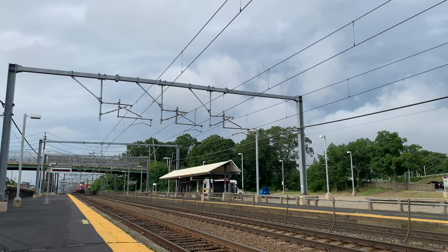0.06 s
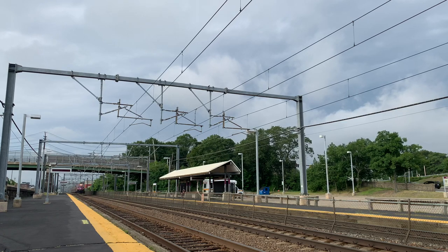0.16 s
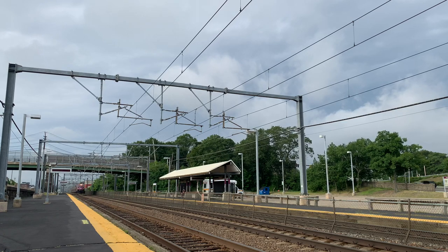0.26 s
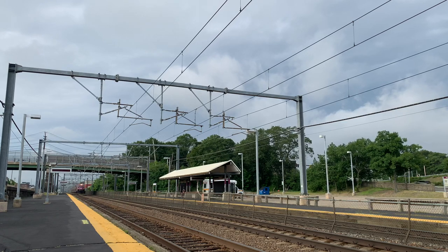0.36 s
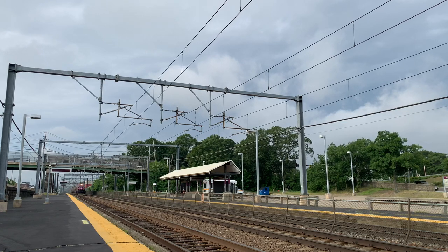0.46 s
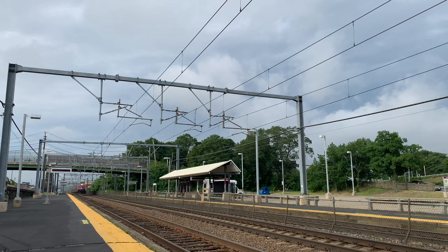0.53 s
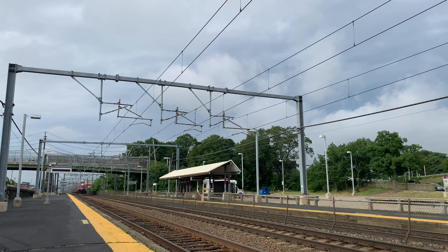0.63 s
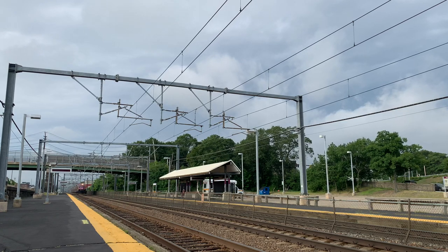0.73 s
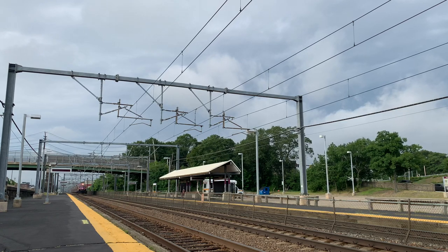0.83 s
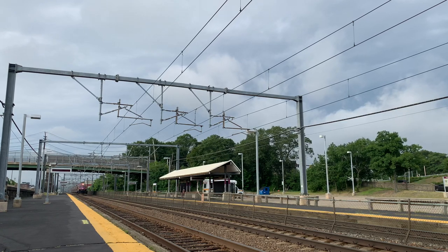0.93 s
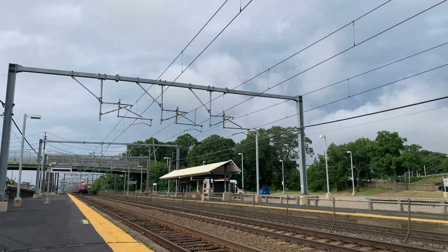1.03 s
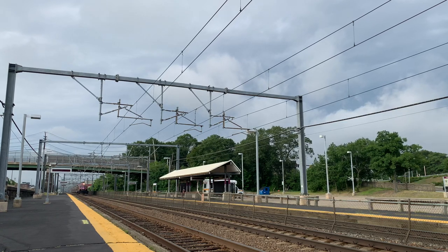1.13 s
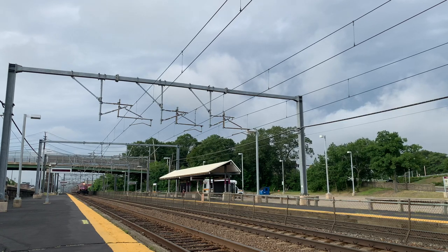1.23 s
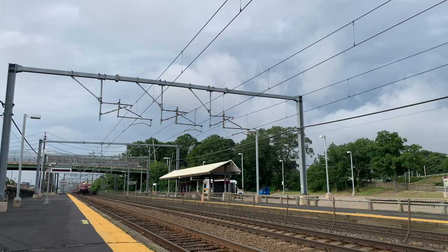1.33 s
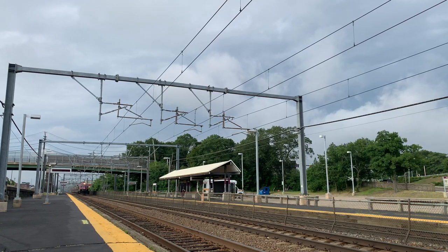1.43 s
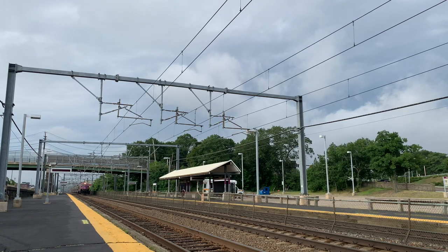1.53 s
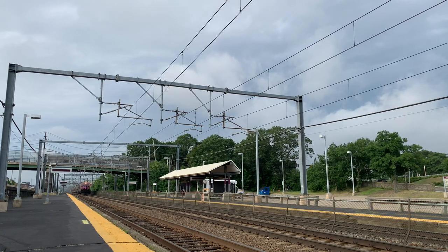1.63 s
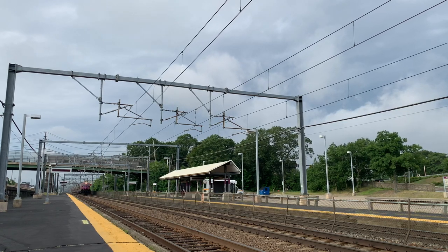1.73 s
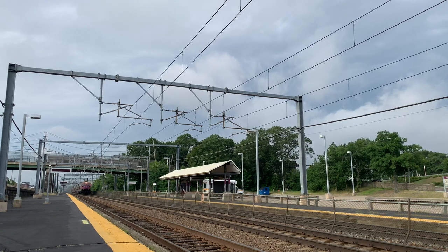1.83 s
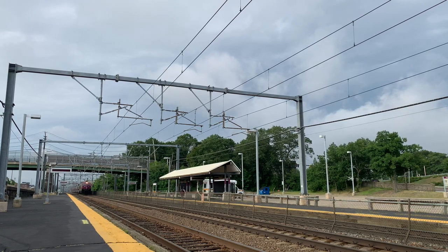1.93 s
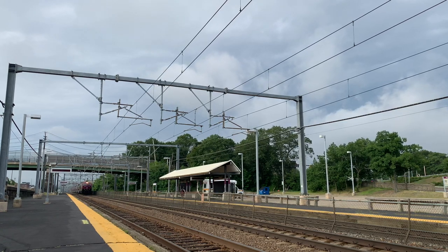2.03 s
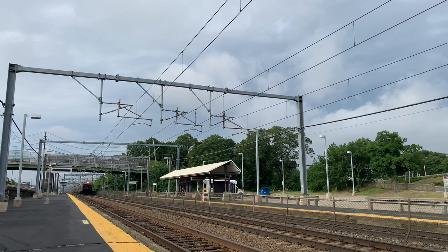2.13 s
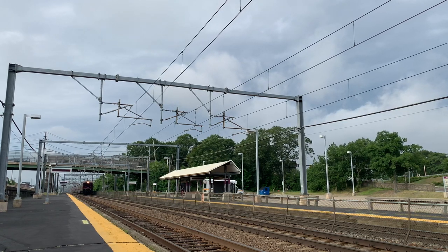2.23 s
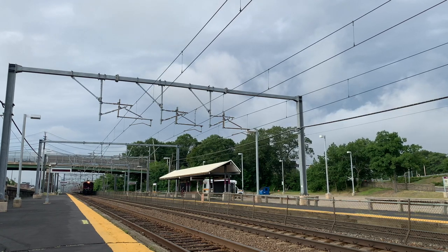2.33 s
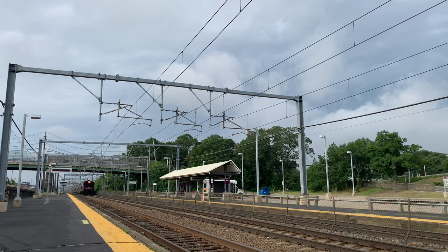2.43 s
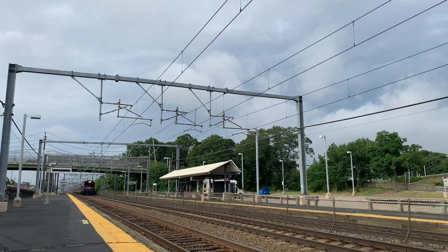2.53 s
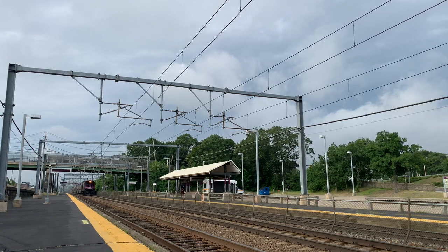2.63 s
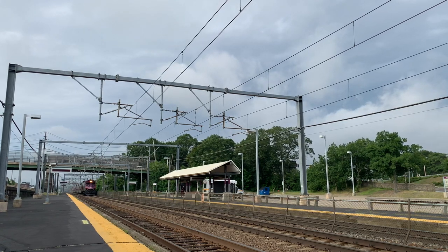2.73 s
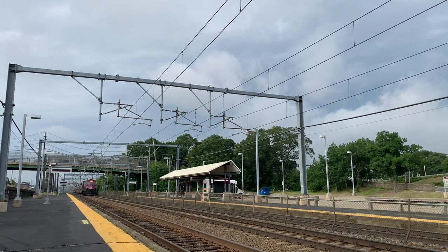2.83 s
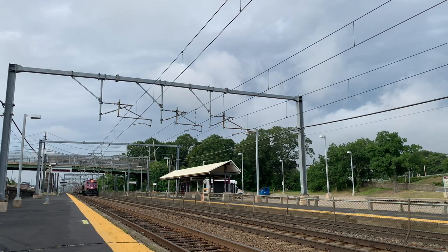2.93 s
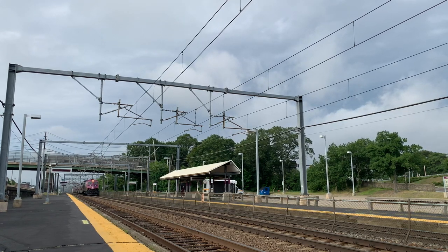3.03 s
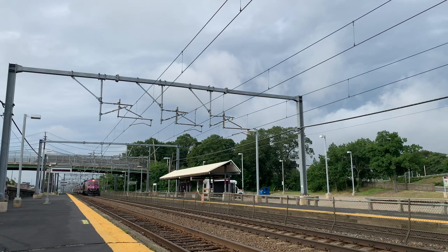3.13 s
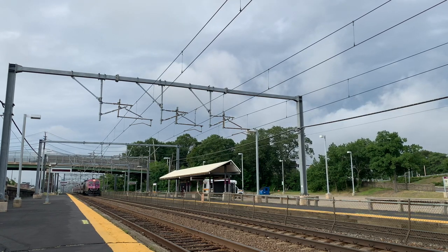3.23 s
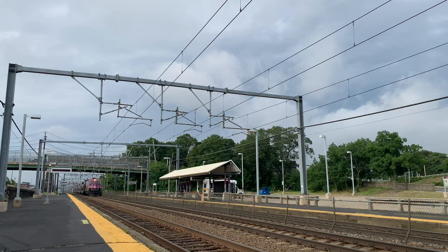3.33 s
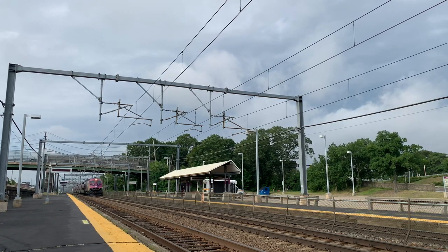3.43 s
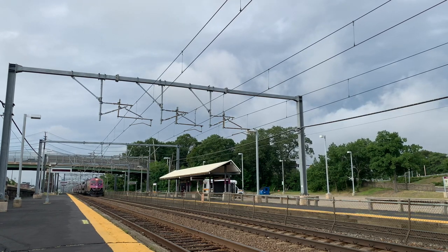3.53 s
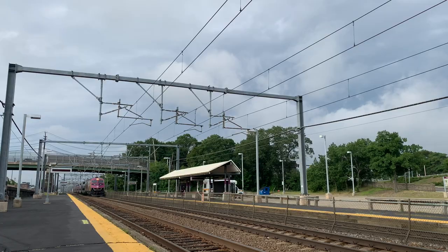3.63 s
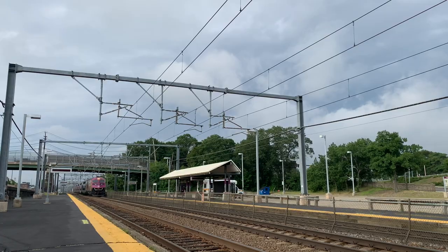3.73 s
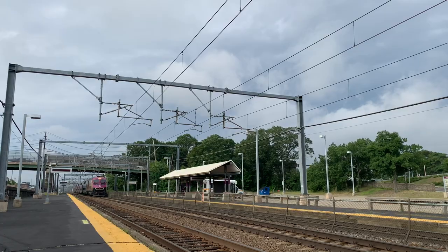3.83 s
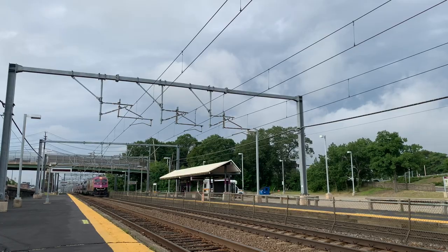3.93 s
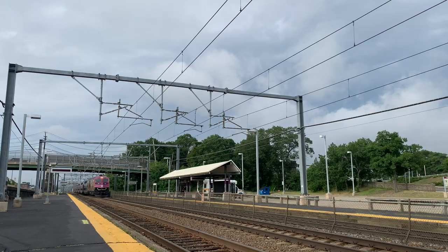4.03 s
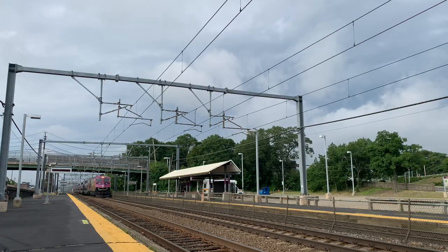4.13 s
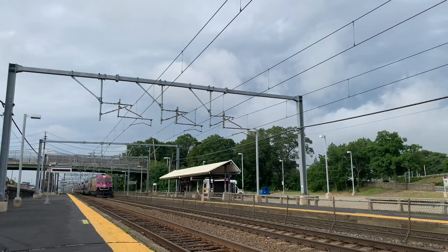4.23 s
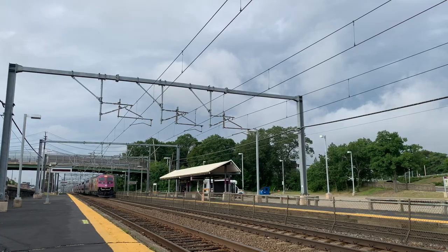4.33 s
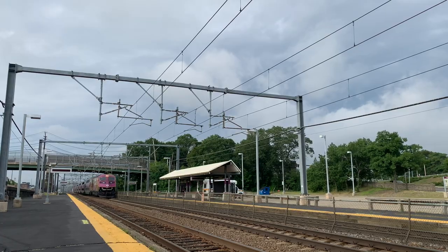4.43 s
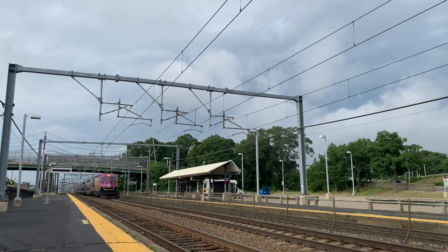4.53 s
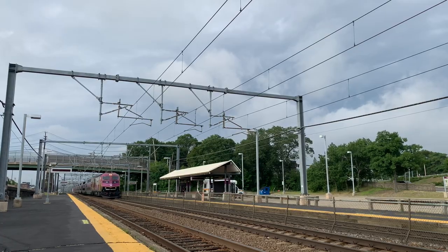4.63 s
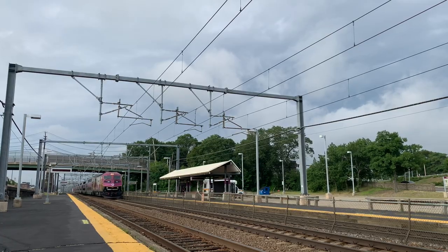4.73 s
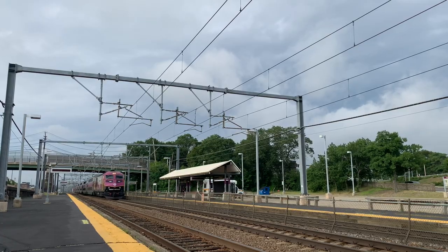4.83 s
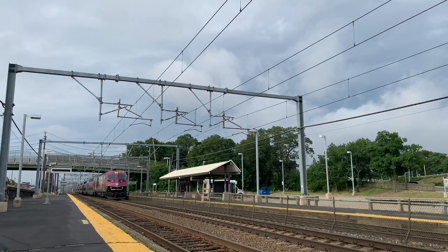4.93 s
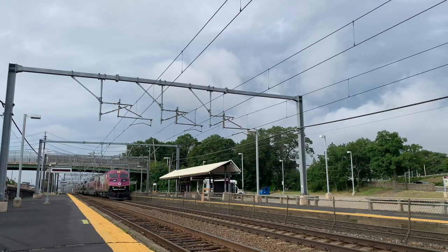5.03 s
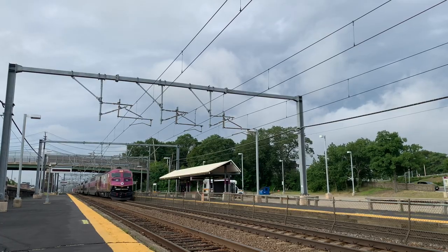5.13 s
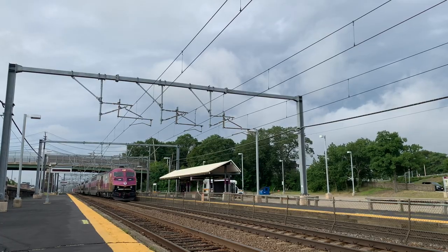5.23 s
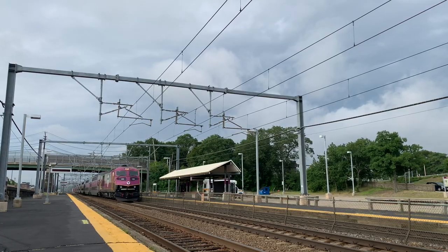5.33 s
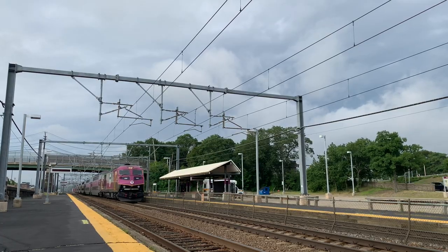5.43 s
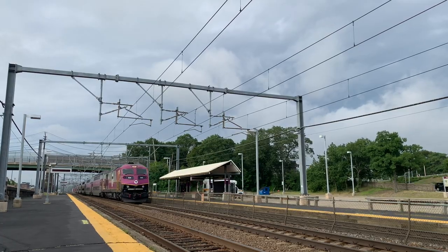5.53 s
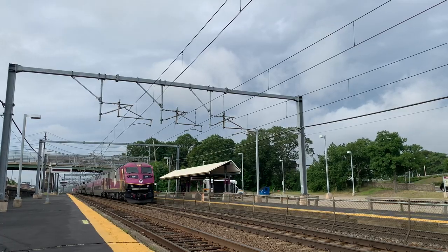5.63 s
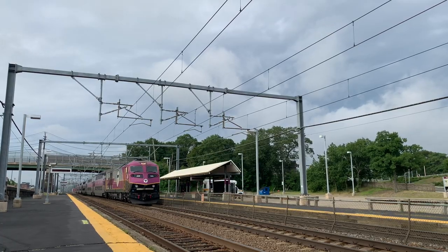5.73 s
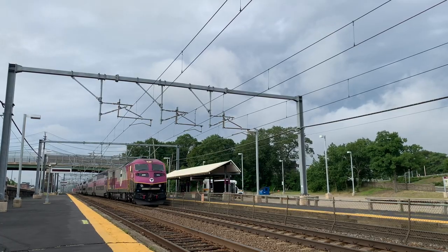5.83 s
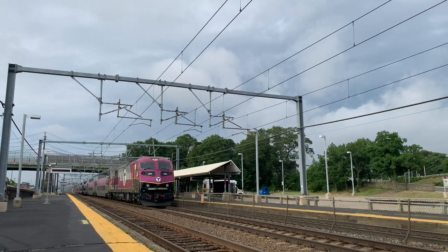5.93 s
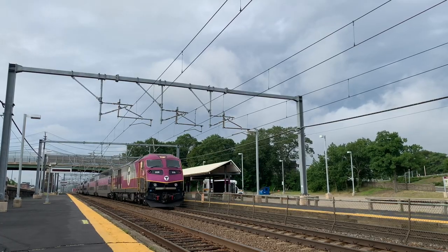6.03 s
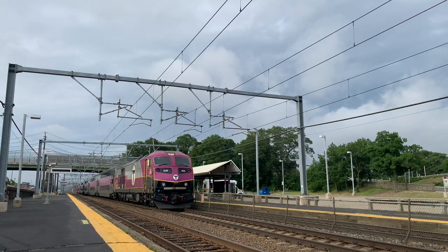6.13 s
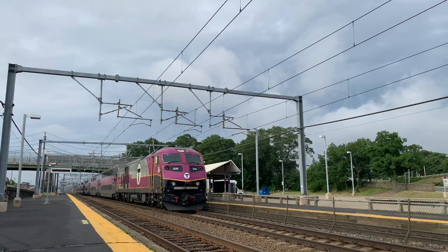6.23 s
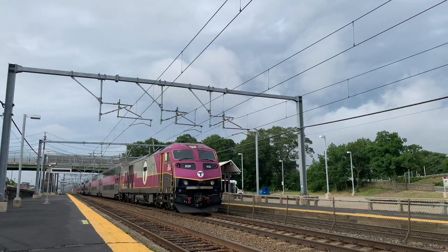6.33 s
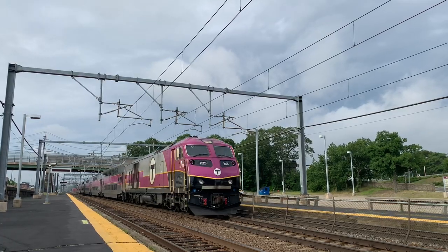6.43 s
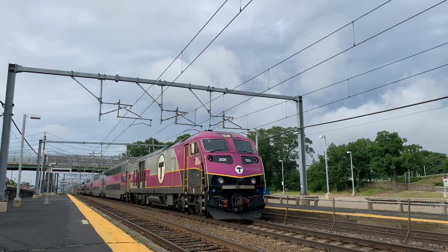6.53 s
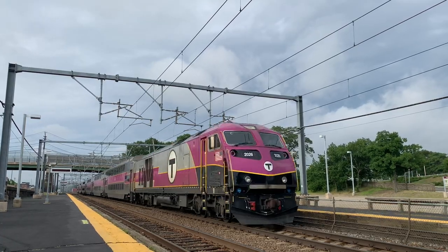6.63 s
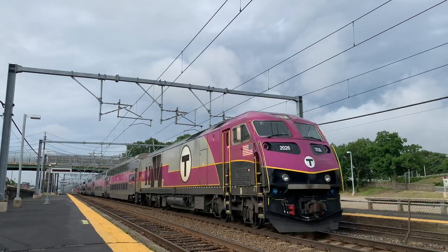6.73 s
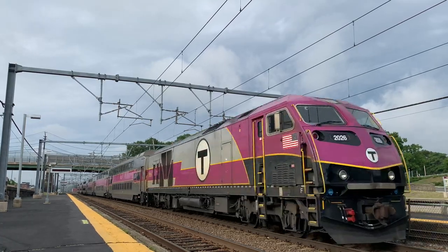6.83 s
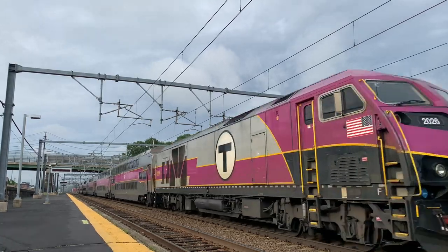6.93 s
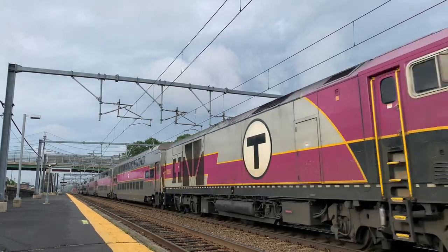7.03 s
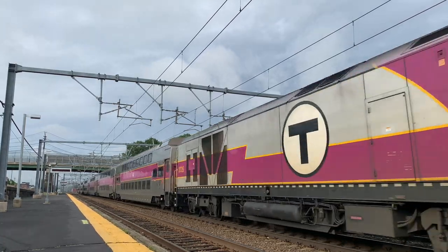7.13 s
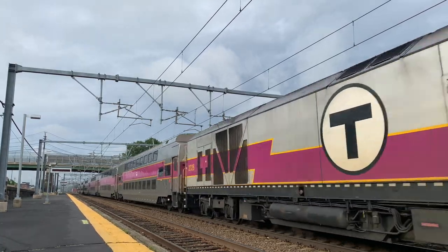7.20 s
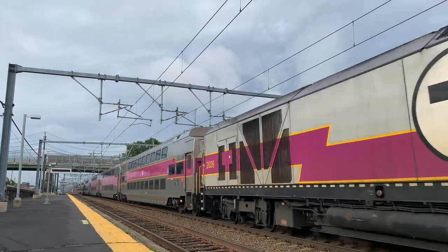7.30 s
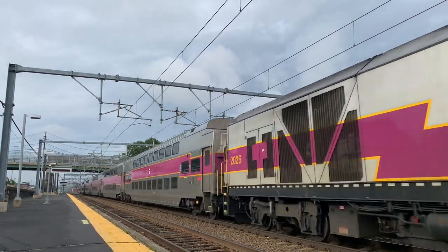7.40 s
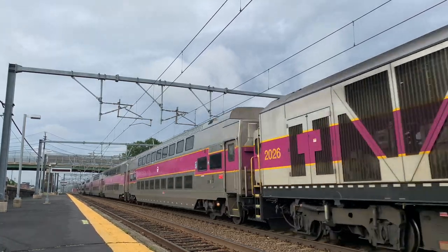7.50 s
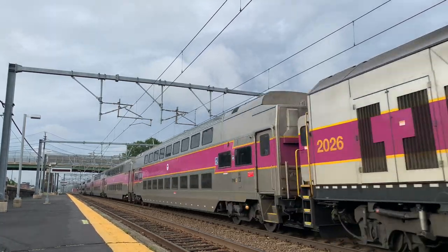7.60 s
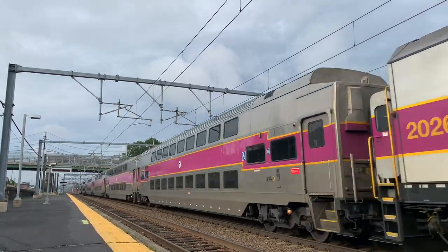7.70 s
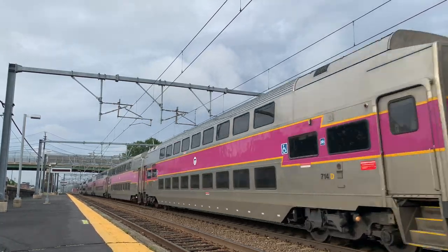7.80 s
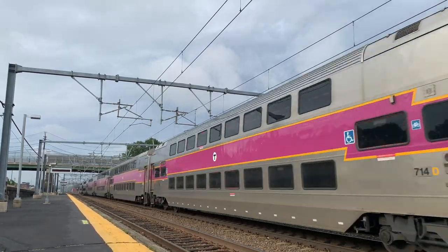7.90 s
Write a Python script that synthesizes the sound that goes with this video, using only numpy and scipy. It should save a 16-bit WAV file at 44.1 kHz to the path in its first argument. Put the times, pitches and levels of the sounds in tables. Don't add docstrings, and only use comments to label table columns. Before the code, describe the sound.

A diesel passenger train approaches an open platform, its low drone swelling into a heavy rolling roar with knocking joints and brief wheel squeaks, while a camera clicks nearby.

```python
import sys
import numpy as np
from scipy import signal
from scipy.fft import rfft, irfft, next_fast_len
from scipy.io import wavfile
from scipy.ndimage import uniform_filter1d

SR = 44100
rng = np.random.default_rng(int(sys.argv[2]) if len(sys.argv) > 2 else 0)


def gain_from_db(level_db):
    decades = np.asarray(level_db, float) / 20
    return 10 ** decades


def dump(signal):
    limited = np.clip(np.atleast_2d(signal).T, -1, 1)
    pcm = np.round(limited * 32767).astype(np.int16)
    wavfile.write(sys.argv[1], SR, pcm)


N = 351036
PAD = next_fast_len(N + SR // 4)
TIME_S = np.arange(N) / SR
COARSE_S = np.arange(0, N + 64, 64) / SR


def in_time(rows):
    s, values = np.transpose(rows)
    return np.interp(TIME_S, s, values)


def at_hz(points, hz):
    p = np.array(points, float)
    return np.interp(np.log(hz + 1), np.log(p[:, 0] + 1), p[:, 1])


def bump(s, length):
    return np.exp(-4 * ((COARSE_S - s) / max(length, .02)) ** 2)


def bumps(rows):
    total_db = sum(db * bump(s, length) for s, db, length in rows)
    return np.interp(TIME_S, COARSE_S, total_db)


def rms_one(x):
    return x / np.sqrt(np.mean(x ** 2) + 1e-20)


def drift(rate):
    r = np.exp(-80 * np.pi * rate / SR)
    slow = signal.lfilter([1], [1, -2 * r, r * r], rng.standard_normal(N // 40 + 2002))[2000:]
    return np.interp(np.arange(N) / 40, np.arange(len(slow)), rms_one(slow))


def resonate(x, hz, width_hz):
    r = np.exp(-np.pi * width_hz / SR)
    return signal.lfilter([1, 0, -1], [1, -2 * r * np.cos(2 * np.pi * hz / SR), r * r], x)


def coloured(spectrum):
    hz = np.fft.rfftfreq(PAD, 1 / SR)
    inside = (hz > spectrum[0][0]) & (hz < spectrum[-1][0])
    shaped = rfft(rng.standard_normal((2, PAD))) * gain_from_db(at_hz(spectrum, hz)) * inside
    return rms_one(irfft(shaped, PAD)[:, :N])


# time_s, level_db (re alongside)
NEARNESS = [(0, -22), (.9, -22), (1.5, -20.5), (2.2, -18.5), (2.95, -17.5), (3.5, -14), (4.3, -13),
            (4.95, -11.5), (5.35, -10.5), (5.75, -8.5), (6.15, -7.5), (6.55, -5), (6.8, -2), (7.08, -1.5),
            (7.4, -0.5), (7.65, -0.5), (7.96, -2.5)]
# pitch_hz, loss_db (per dB of distance loss)
DULLING = [(35, 0.07), (150, 0.82), (500, 1), (2400, 1.4941), (5500, 1.5), (9500, 1.56)]
# centre_s, level_db, length_s, centre_hz
LIFTS = [(-0.5, 9, 0.25, 170), (0, 5, 0.17, 125), (2.5, 2, 1.1, 560), (3.5, 6, 1.26, 1230),
         (5, 10, 0.59, 140), (5.5, 8.5, 0.7, 112), (7.5, 3, 0.032, 550), (7, -3, 0.21, 320),
         (6.5, 5, 0.087, 340), (7.0, 6, 0.13, 440), (7.44, 2.5, 0.4, 1200), (7, 2, 0.47, 510),
         (5.5, 2.5, 1.5, 9800), (5.5, 8.5, 4, 11600), (6, 5.5, 0.66, 84), (6.5, 5, 0.19, 180),
         (7.5, -4, 0.14, 470), (7.5, -4, 0.16, 350), (1.2, -3.5, 0.18, 570), (1.5, 3, 2.3, 1560),
         (8, 2.5, 0.25, 2800), (-1, -2.5, 1.2, 380), (7.5, 3, 0.48, 1170), (8, 4.5, 0.32, 350),
         (5, 5.5, 0.4, 160), (5, -4.5, .7, 160), (8, 3.5, 0.21, 150), (0.5, -7, 0.57, 120),
         (0.1, 5, 0.21, 200), (3.5, 1.5, 0.29, 1700), (6.5, 2.5, 0.25, 6900), (5.5, 2, .3, 3100),
         (7.4, 2, 0.24, 1500), (2, -1, 0.23, 270), (7.5, -3.5, 0.43, 120), (0, 4, 0.22, 140),
         (5, 3, 0.27, 240), (8, -3.5, 0.23, 290), (8, 2.5, 0.27, 210), (3, 0.5, 0.4, 800),
         (7.5, 2, 0.19, 550), (0.3, -3, .3, 260), (1, 0, .15, 90), (3, 0, 0.13, 80)]


def train_reach():
    lift_octaves = 0.96
    slam_s, slam_db, slam_decay_s, slam_hz = 6.262, 10, .25, 360
    nearness_db = np.interp(COARSE_S, *np.transpose(NEARNESS))
    slam = slam_db * (COARSE_S > slam_s) * np.exp(-np.abs(COARSE_S - slam_s) / slam_decay_s)
    lifts = np.array([db * bump(s, length) for s, db, length, _ in LIFTS] + [slam])
    centres = np.array([hz for *_, hz in LIFTS] + [slam_hz])

    def reach(hz):
        closeness = np.exp(-(np.log2(hz / centres) / lift_octaves) ** 2)
        gain_db = at_hz(DULLING, hz) * nearness_db + closeness @ lifts
        return np.interp(TIME_S, COARSE_S, gain_db)

    return reach


# time_s, level_db
DRONE = [(0, -31.5), (.15, -29), (.46, -26.5), (.62, -22.5), (1.1, -22), (1.5, -19.5), (2.35, -19),
         (2.55, -24.5), (2.97, -22), (3.2, -10.5), (3.6, -14.5), (4.1, -16.5), (4.7, -16.5), (5.0, -13.5),
         (5.9, -15.5), (6.2, -8), (6.65, -9.5), (7.96, -11)]
# centre_s, depth_db, length_s
FADES = [(0.807, -14, 0.22), (0.983, -16, 0.055), (2.45, -41, 0.071), (2.85, -5, 0.091), (3.44, -12, 0.12),
         (3.724, -1, 0.054), (4.29, -21, 0.082), (4.48, -6, 0.098), (5.142, -8.5, 0.095),
         (5.33, -18, 0.046), (5.517, -25, 0.19), (5.675, -1, 0.086), (5.924, -14, 0.072),
         (6.064, -3.5, 0.17), (6.27, -2, 0.09), (6.408, 0.5, 0.084), (6.862, -7, 0.14), (7.2, 2, 0.41),
         (7.897, -2, 0.19)]
# order, level_db (alongside), share of nearness, waver_db
SIDE_ORDERS = [(2, -19.5, 0.82, 1), (5, -14.5, 0.99, 2), (6, -20, 1.15, 3.5)]
# centre_s, order, level_db, length_s
THROBS = [(.6, 5, -17, 0.37), (0.916, 5, 18, 0.047), (1.032, 5, 13.5, 0.044), (1.265, 5, 6, 0.17),
          (2.12, 5, 9.5, 0.13), (1.8, 5, -4, 0.39), (3.45, 5, 1, .6), (3.646, 5, 0, 0.11),
          (3.8, 5, 5.5, 0.15), (4.03, 5, 7.5, 0.29), (4.267, 5, 9.5, 0.089), (4.91, 6, -2.5, .2),
          (4.655, 5, -13, 0.13), (5.073, 5, 9, 0.066), (6.43, 6, -10, .15), (5.58, 5, 2, 0.28),
          (5.633, 5, -21, 0.04), (5.918, 5, 3, 0.3), (6.215, 5, 8, 0.66), (6.686, 5, -10, 0.15),
          (6.887, 5, 6, 0.18), (7.305, 5, -7, 0.1), (7.836, 5, -4, 0.45), (0.203, 2, -13, .8),
          (4.225, 6, 11, 0.32), (5.677, 2, 4, 0.27), (6.55, 2, -20, 0.38), (7.2, 2, -13, 1.4),
          (5.5, 6, 6, 1.95), (7.55, 6, -22, 0.91)]
# order, level_db (re the stronger of orders 4 and 5)
WEAK_ORDERS = [(3, -19), (3.5, -19), (4.5, -21), (7, -26.5), (8, -27.5)]
# time_s, rate_hz
CYCLE = [(0, 19.35), (6.6, 19.33), (7.05, 19.15), (7.3, 18.75), (7.6, 18.0), (7.96, 17.45)]


def engine():
    roughness = 1.5
    drone_db = in_time(DRONE) + bumps(FADES)
    nearness_db = in_time(NEARNESS)
    turn = 2 * np.pi * np.cumsum(in_time(CYCLE)) / SR
    levels = [(4, drone_db)]
    for order, near_db, share, waver_db in SIDE_ORDERS:
        own = [(s, db, length) for s, k, db, length in THROBS if round(k) == round(order)]
        level_db = near_db + share * nearness_db + bumps(own) + waver_db * drift(8.5)
        levels.append((round(order), level_db))
    order_5_db = levels[2][1]
    strong_db = uniform_filter1d(np.maximum(drone_db, order_5_db), SR)
    levels += [(k, strong_db + db + 3 * drift(3)) for k, db in WEAK_ORDERS]
    out = 0
    for k, db in levels:
        waver = 6 * rng.random((2, 1)) + .2 * np.array([drift(2), 4 * drift(2)])
        phase = k * turn + waver * (1 + roughness * abs(k - 4.3)) * min(k / 3, 1)
        out = out + np.sqrt(2) * gain_from_db(db + drift(9.9)) * np.sin(phase)
    return out


# pitch_hz, level_db (per Hz)
ROLLING = [(160, -14.5), (300, -19.5), (630, -17), (1000, -20), (1700, -29.5), (2500, -32), (3100, -35),
           (5000, -40), (7400, -50.5), (9000, -46.5), (12000, -47.5), (15700, -62)]
# pitch_hz, level_db (per Hz)
RUMBLE = [(22, -48), (33, -31), (55, -10.5), (80, -10), (120, -12.5)]
# pitch_hz, width_hz, level_db
WHEELS = [(245, 51, -23), (370, 26, -18), (454.5, 18, -11.5), (548, 45, -22.5), (657, 16.5, -9),
          (786, 24, -14), (976, 56, -16.5), (1305, 31, -17.5), (1982, 41, -17.5), (2431, 37, -18),
          (2630, 10, -25), (4414, 25, -30)]
# centre_s, pitch_hz, level_db, length_s
RINGING = [(6.36, 2424, 0, .4), (6.75, 2424, 2.5, .35), (7.1, 2424, -7, .25), (7.44, 2424, 6, 0.19),
           (7.79, 2424, -11, .45), (7, 2424, -2, .25), (5, 2650, 9, 0.22), (7.64, 1975, -8, .5),
           (7.35, 1975, 2, .3), (6.84, 657, -7, 0.74), (7.65, 657, 4, 0.17), (6.75, 456, -4.5, 0.86),
           (7.6, 456, 4, 0.17), (6.9, 1311, 4, 0.25), (7.1, 1311, 7.5, 0.32), (7.7, 1311, -9, .5),
           (5.3, 957, -1, 0.33), (7.5, 957, 1, .5), (7.3, 790, 5.5, .3), (6.7, 790, -7, 0.65),
           (9.2, 366, 7, 0.36), (6.6, 366, -8, 0.26), (0.89, 542, -7, 1.5), (5.6, 657, -1.5, .5),
           (5.6, 790, -5, .5), (6.95, 542, 6, .3)]


def rolling():
    reach = train_reach()
    white = rng.standard_normal((2, 2, N))
    together = drift(6)
    edges = 25 * 2 ** np.arange(0, 9.4, 1 / 3)
    out, total = 0, 0
    for k, (low, high) in enumerate(zip(edges, edges[1:])):
        hz = np.sqrt(low * high)
        third_octave = signal.butter(2, [low, high], "band", fs=SR, output="sos")
        band = signal.sosfilt(third_octave, white[k % 2])
        total += gain_from_db(2 * at_hz(ROLLING, hz)) * (high - low) * (hz > 130)
        level_db = at_hz(RUMBLE + ROLLING, hz) + reach(hz) + .8 * together + 1.5 * drift(8)
        out = out + band * gain_from_db(level_db)
    out = out / np.sqrt(2 * total / SR)

    heard = np.cumsum((in_time(CYCLE) / CYCLE[0][1]) ** .3)
    for hz, width_hz, db in WHEELS:
        ringing = rms_one(resonate(white[0, :, ::-1], hz, width_hz))
        sunk = np.array([np.interp(heard, np.arange(N), side) for side in ringing])
        own = [(s, lift, length) for s, near, lift, length in RINGING if abs(near / hz - 1) < .08]
        passing_db = bumps(own + [(0, 0, 1)])
        out += sunk * gain_from_db(db + 1.343 * reach(hz) + 2.2 * drift(3.5) + passing_db)
    return gain_from_db(-16.5) * out


# start_s, peak_db, pitch_hz, length_s
JOLTS = [(5.448, -19.5, 398, 0.02), (5.833, -17, 433, 0.02), (5.996, -15, 385, 0.028),
         (6.06, -15, 482, 0.025), (6.169, -12, 436, 0.02), (6.21, -16, 484, 0.023), (6.268, -12, 380, 0.02),
         (6.314, -19, 417, 0.016), (6.392, -16, 385, 0.02), (6.44, -14, 358, 0.02),
         (6.507, -12, 371, 0.025), (6.691, -12, 799, 0.02), (6.733, -14, 444, 0.02),
         (6.898, -10, 509, 0.022), (6.991, -9, 312, 0.022), (7.081, -25, 619, 0.02), (7.165, -5, 425, 0.02),
         (7.222, -10, 452, 0.02), (7.289, -3, 797, 0.02), (7.426, -11, 899, 0.02), (7.493, -19, 754, 0.02),
         (7.575, -12, 447, 0.022), (7.645, -6, 425, 0.018), (7.795, -7, 1030, 0.024),
         (7.872, -12, 452, 0.02), (7.918, -13, 301, 0.02)]


def jolts():
    long = SR // 5
    out = np.zeros((2, N + long))
    for s, db, hz, length in JOLTS:
        i, age = round(s * SR), np.arange(long) / SR / max(length, .004)
        grit = rng.standard_normal((2, long)) * np.minimum(20 * age, 1) * np.exp(-2.5 * age)
        knock = resonate(grit, hz, width_hz=240)
        out[:, i:i + long] += gain_from_db(db - 6) * knock / np.abs(knock).max(axis=1, keepdims=True)
    return out[:, :N]


# pitch_hz, width_hz, first_db, last_db
SINGING = [(963.5, 43, -48, -30.5), (1332, 10.5, -55, -43)]
# centre_s, pitch_hz, length_s, level_db
SQUEAKS = [
    (7.068, 8950, 0.028, -38),
    (7.164, 8840, 0.066, -34),
    (7.22, 1270, 0.042, -27),
    (7.365, 2570, 0.041, -26.5),
    (7.433, 2490, 0.023, -18.5),
    (7.48, 2320, .03, -26),
    (7.546, 2350, 0.017, -23.5),
    (7.607, 1050, .03, -20),
    (6.302, 970, 0.035, -25),
    (7.76, 636, .06, -18),
]


def rails():
    out = 0
    for hz, width_hz, first_db, last_db in SINGING:
        once = resonate(rng.standard_normal((2, N)), hz, width_hz)
        twice = resonate(once, hz, 4 * width_hz)
        out = out + rms_one(twice) * gain_from_db(np.linspace(first_db, last_db, N) + 2.94 * drift(12.0))
    for s, hz, length, db in SQUEAKS:
        swell = np.exp(-((TIME_S - s) / length) ** 2 * 4)
        out += gain_from_db(db) * swell * rms_one(resonate(rng.standard_normal((2, N)), hz, width_hz=160))
    return out


# pitch_hz, level_db, t60_s
BODY = [(1400, 10.5, 0.023), (2100, 6.5, 0.0021), (2774, -0.5, 0.011), (3550, -2.5, 0.013),
        (4500, -17, 0.0073), (5900, -9, 0.011), (7060, -26, 0.007), (8750, -25, .006), (10600, -12, .005)]


def contact(db, centre_hz, share):
    long = SR // 20
    rattle = rng.standard_normal((2, long)) * np.exp(-np.arange(long) / SR / (0.003 * share))
    rattle[:, :24] *= np.linspace(0, 1, 24)
    rattle[:, 24] += 1.2
    modes = 0
    for hz, mode_db, t60 in BODY:
        gain = gain_from_db(mode_db - 8.5 * np.log2(hz / centre_hz) ** 2)
        modes = modes + resonate(rattle, hz, np.log(1000) / np.pi / t60) * gain
    bare = resonate(resonate(rattle, 3500, width_hz=5000), 3500, width_hz=5000)
    return gain_from_db(db - 24.5) * (modes + 0.11 * bare)


# start_s, peak_db
SHOTS = [
    (0.259, -26),
    (1.326, -27.5),
    (3.9421, -27.5),
    (5.695, -28.5),
]
SLOWNESS = [1, 1.012, .998, 1]
# after_release_s, level_db, centre_hz, rattle length factor
CAMERA = [(-.012, -6, 5580, 0.44), (0, -1.5, 3120, 1.1), (.010, -21, 1400, 0.98), (.022, -15, 1400, 1.3),
          (.029, -12, 3500, 0.66), (.039, -13, 2100, 0.7), (.0712, 3.5, 5900, 1.1),
          (0.0705, -12, 1400, 0.8), (.121, 5, 3400, .8), (.127, -7, 2100, .6), (.139, -5, 2800, .6),
          (.133, -1.5, 3550, 1.3), (.143, -15.5, 3550, 1.8), (0.154, -24, 2100, 1.5)]
# first_hz, last_hz, level_db
WINDER = [(2370, 2200, -19), (7240, 6000, -26)]
# start_s, peak_db
TICKS = [
    (2.5592, -29.5),
    (2.8144, -46),
    (2.8439, -33),
    (3.158, -32),
]


def camera():
    out, long = np.zeros((2, N)), SR // 20
    whirr = rms_one(resonate(rng.standard_normal((2, N)), 2200, width_hz=1000))
    for (s, shot_db), slow in zip(SHOTS, SLOWNESS):
        for after, db, centre_hz, share in CAMERA:
            i = round((s + after * slow) * SR)
            out[:, i:i + long] += contact(shot_db + db, centre_hz, share)
        for after, length, db in [(-.02, 0.088, -16.5), (.095, 0.093, -14.5)]:
            i, n = round((s + after) * SR), round(length * SR)
            out[:, i:i + n] += gain_from_db(shot_db + db) * np.hanning(n) * whirr[:, i:i + n]
        for first_hz, last_hz, db in WINDER:
            n = round(.036 * SR)
            i = round((s + .148 * slow ** 5) * SR)
            whine = np.sin(2 * np.pi * np.cumsum(np.linspace(first_hz, last_hz, n)) / SR)
            out[:, i:i + n] += gain_from_db(shot_db + db) * np.hanning(n) ** .5 * whine
    for s, db in TICKS:
        i = round(s * SR)
        out[:, i:i + long] += contact(db, centre_hz=5000, share=0.62)
    return out


# start_s, thud_db, flap_db, length_s
GUSTS = [(0.157, -40, -47.5, 0.02), (0.853, -22, -25, 0.023), (0.876, -19.5, -31, 0.029),
         (0.898, -38, -16.5, 0.036), (0.913, -15.5, -41, 0.031), (1.052, -21.5, -23, 0.011),
         (1.253, -31, -34, 0.021), (1.607, -31, -38, 0.019), (2.516, -21, -18, 0.012),
         (2.661, -21.5, -38, 0.04), (2.85, -24, -23, 0.015), (3.157, -31, -27, 0.028),
         (3.52, -21, -26, 0.02), (4.1, -10.5, -16.5, 0.027), (4.15, -15, -32, 0.016),
         (4.212, -6.5, -22, 0.024), (4.233, -14, -30, 0.018), (4.281, -19.5, -21, 0.033),
         (5.105, -13.5, -57, 0.015), (5.612, -13.5, -33, 0.014), (5.847, -9, -17.5, 0.012),
         (6.264, -9, -3, 0.013), (6.325, -20.5, -28, 0.013), (7.045, -20, -8.5, 0.017),
         (7.17, -18, -6.5, 0.032)]


def gusts():
    out, long = np.zeros((2, N)), SR // 10
    for s, thud_db, flap_db, length in GUSTS:
        i, age = round(s * SR), np.arange(long) / SR / max(length, .004)
        for db, edges_hz in [(thud_db, [110, 300]), (flap_db, [260, 560])]:
            puff = rng.standard_normal((2, long)) * age * np.exp(-4.5 * age)
            lump = signal.sosfilt(signal.butter(3, edges_hz, "band", fs=SR, output="sos"), puff)
            out[:, i:i + long] += gain_from_db(db - 1.0) * lump / np.abs(lump).max(axis=1, keepdims=True)
    return out


# time_s, level_db
INSECTS = [(0, -55), (1.6, -53), (2.2, -50.5), (4, -49.5), (6.0, -48.5), (6.5, -51.5), (7.4, -59),
           (7.96, -57)]
# centre_s, level_db, length_s
SWELLS = [(0, 4.5, 0.19), (.4, 2, .1), (.63, 4.5, 0.25), (.82, 3.5, .2), (1.87, 2.5, 0.27), (2.1, 0, .2),
          (2.6, 2, 0.47), (2.88, -2.5, .12), (3.08, 4, .2), (3.3, -1, .3), (3.63, 2.5, .2),
          (3.97, 3.5, 0.26), (4.2, 1, .3), (4.46, -4, .1), (4.65, 2.5, 0.36), (4.9, -2, .1),
          (5.05, 3.5, 0.18), (6.2, 3, .3), (6.38, -4, .15), (6.66, 8, 0.41), (7.25, 8, .5), (7.75, 4, .25)]
# pitch_hz, level_db (per Hz)
CHOIR = [(8300, -50), (8900, -32), (9350, -7.5), (9800, -18), (10500, -4.5), (11500, 0), (12500, 5),
         (13500, -2), (14500, -4), (15800, -15)]


def insects():
    level_db = in_time(INSECTS) + bumps(SWELLS)
    return gain_from_db(level_db + 6.0 + 0.36 * drift(40)) * coloured(CHOIR)


# pitch_hz, level_db (per Hz)
TOWN = [(1200, 6), (2500, -7), (4000, -12.5), (5500, -17), (7000, -19), (8000, -21.5), (9000, -23)]


def surroundings():
    return gain_from_db(-54 + 0.98 * drift(1.8)) * coloured(TOWN)


# pitch_hz, left_lead_rad
PORT_PHASE = [(0, 0), (80, .3), (500, .6), (950, 3.3), (1500, 4.0), (2300, 6.0), (3300, 9.2),
              (4650, 4 * np.pi), (7100, 2.5 * np.pi), (9300, 2 * np.pi), (16275, -np.pi)]
# pitch_hz, share (0-1)
LIKENESS = [(30, 0.7), (65, 0.98), (130, 0.79), (300, 0.69), (600, 0.55), (950, 0.38), (1310, 0.44),
            (1700, 0.81), (2800, 0.36), (5000, 0.07), (6800, 0), (7600, 1), (8700, 0.96), (15500, 1)]
# pitch_hz, left_minus_right_db
TILT = [(30, -.8), (80, -2), (130, -.6), (300, 0), (700, 0), (1400, -1), (2800, -1.2), (5000, -3),
        (7000, -1), (8000, 0)]


def ports(pair):
    hz = np.fft.rfftfreq(PAD, 1 / SR)
    common, own = rfft(pair, PAD)
    alike = np.clip(at_hz(LIKENESS, hz), 0, 1)
    tilt = gain_from_db(at_hz(TILT, hz) / 2)
    lead = np.exp(.5j * np.interp(hz, *np.transpose(PORT_PHASE)))
    right = alike * common + np.sqrt(1 - alike ** 2) * own
    return irfft([common * lead * tilt, right / lead / tilt], PAD)[:, :N]


def starved(x):
    hz, spectrum = np.fft.rfftfreq(PAD, 1 / SR), rfft(x, PAD)
    spectrum = spectrum * np.where(hz > 15250, gain_from_db(-16), 1)
    gaps_hz = [(11400, 11720), (11080, 12280)]
    narrow, wide = [irfft(spectrum * ((hz < low) | (hz > high)), PAD)[:, :N] for low, high in gaps_hz]
    load = np.interp(TIME_S, (5.0, 7.0), [0, 1])
    return narrow + load * (wide - narrow)


def scene():
    common, own = camera()
    beside = np.array([common, gain_from_db(1.5) * (0.073 * common + 1.11 * own)])
    train = engine() + rolling() + jolts() + rails()
    return ports(train + gusts() + insects() + surroundings()) + beside


def top_cut(x):
    return signal.sosfilt(signal.butter(12, 15700, fs=SR, output="sos"), x)


def record(dry):
    rounded = 1.441 * np.tanh(dry / 1.38)
    mix = np.clip(starved(rounded), -.99, .99)
    return top_cut(mix)


dry = scene()
out = record(dry)
dump(out)
```